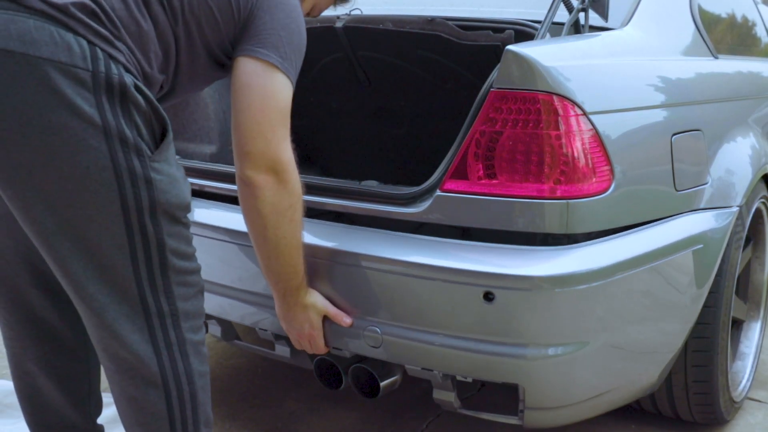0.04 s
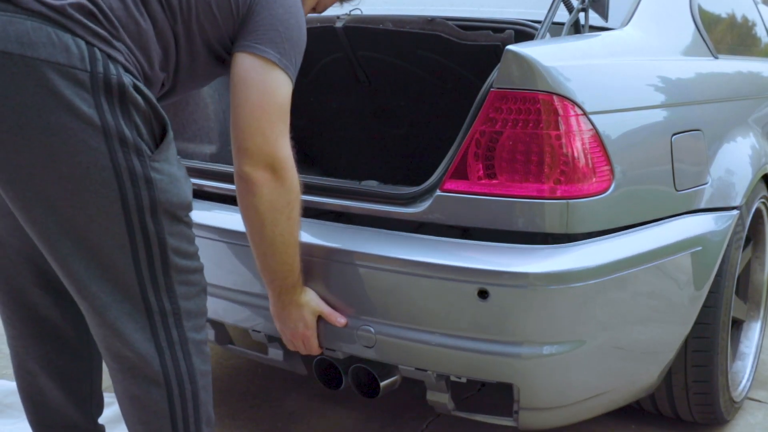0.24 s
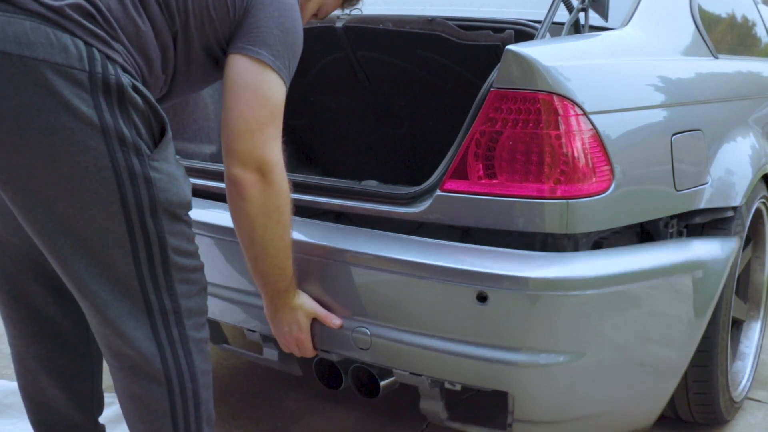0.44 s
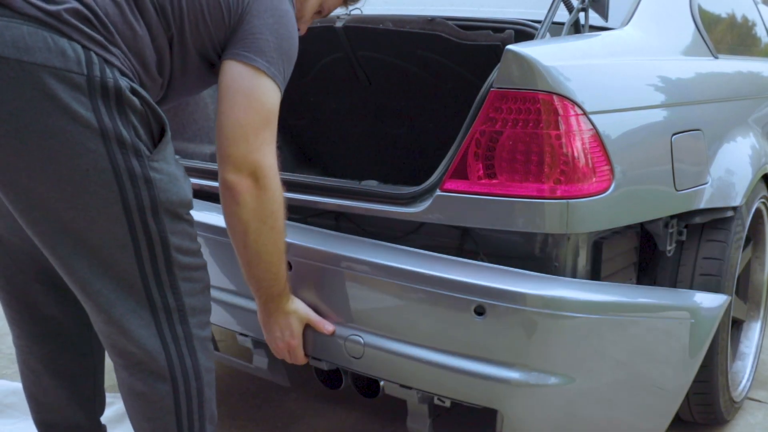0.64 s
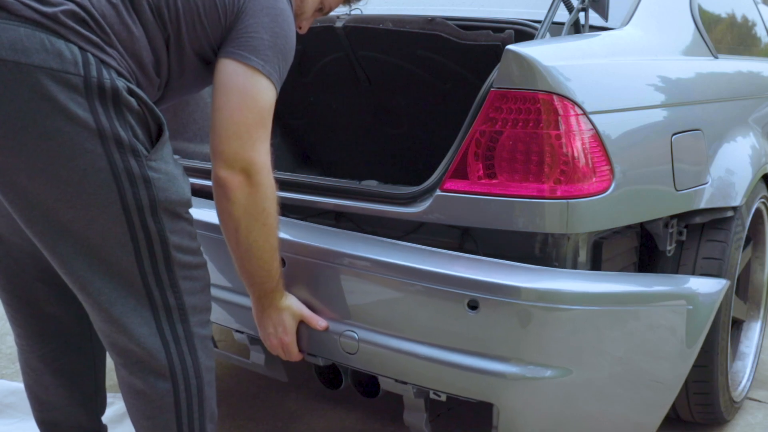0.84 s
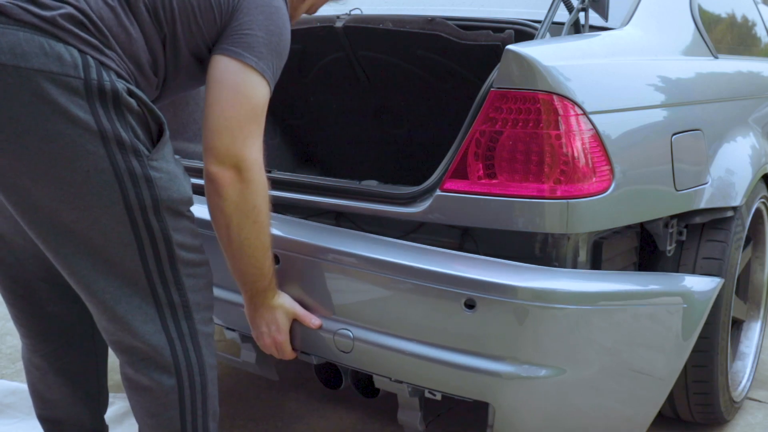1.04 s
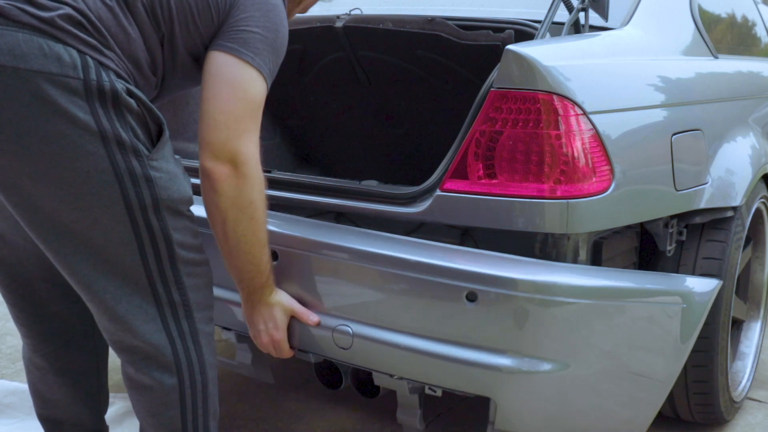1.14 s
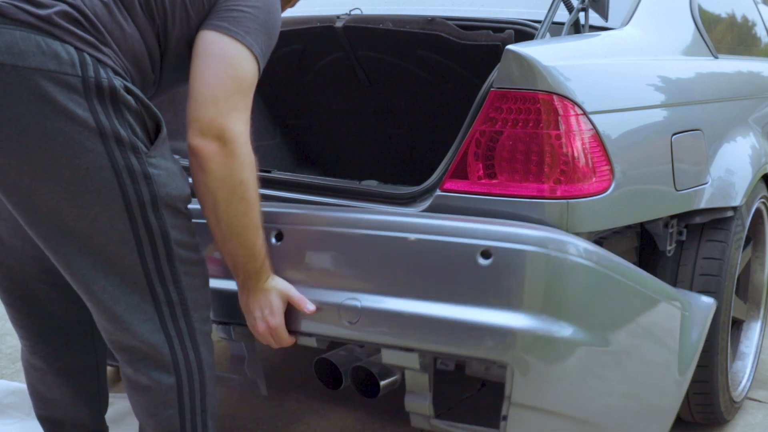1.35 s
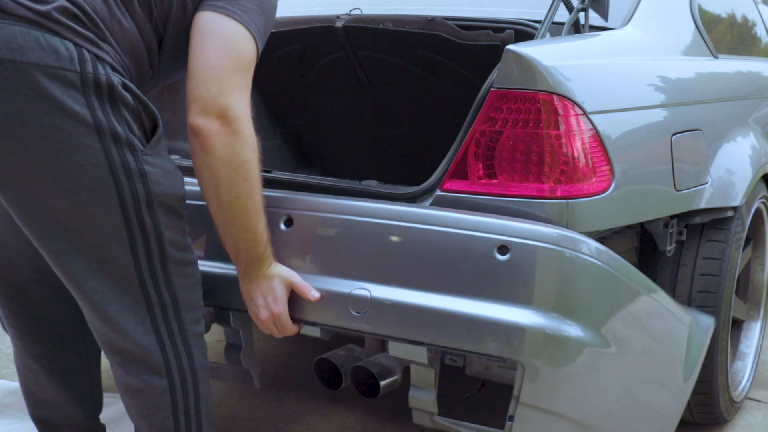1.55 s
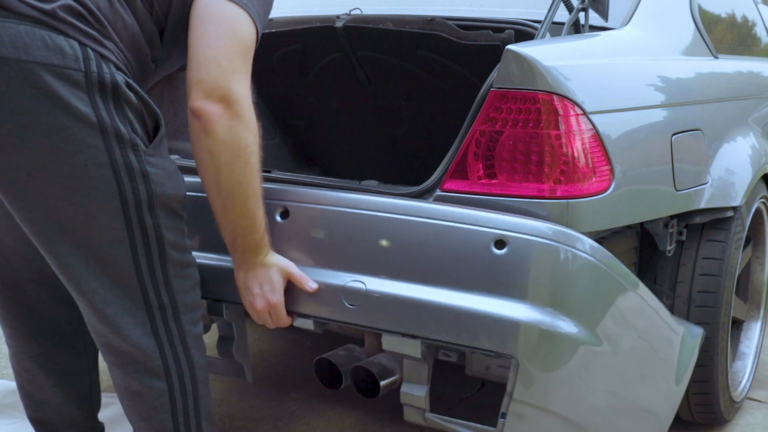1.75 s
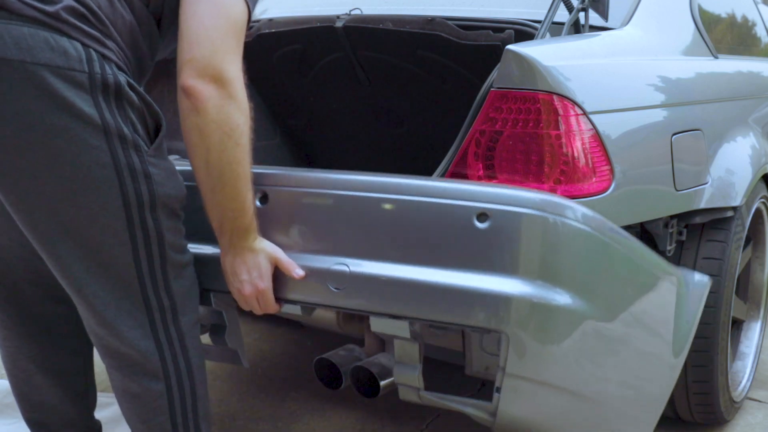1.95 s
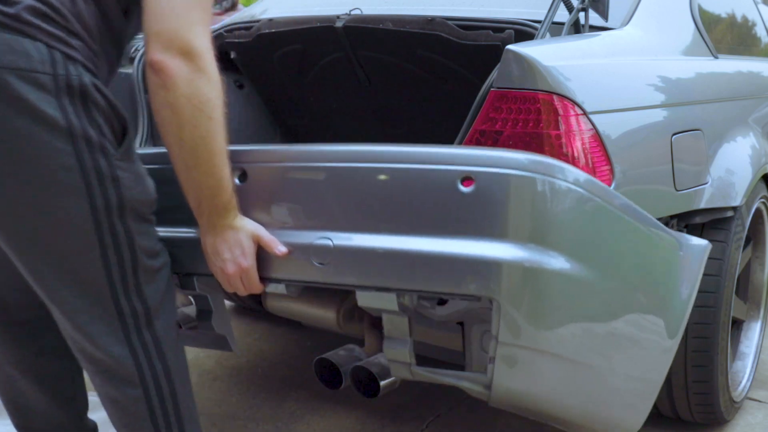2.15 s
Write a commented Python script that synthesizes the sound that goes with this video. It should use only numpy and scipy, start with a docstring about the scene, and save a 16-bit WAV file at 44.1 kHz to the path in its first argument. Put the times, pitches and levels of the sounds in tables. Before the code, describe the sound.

A car's plastic bumper is pulled loose, cracking and clattering, then knocking with a dull boom

```python
"""A plastic bumper cover is pulled off a car in a garage, over a low room rumble and hiss.
First it jumps off its mounts: clusters of knocks ring the modes of each part, and clips snap as noise cracks.
Between the knocks, stick-slip pulses drag it over the brackets, and gliding chirps squeak on the paint.
Past one second the freed shell booms softly, a low tone with narrow noise, among more knocks.
The last scrapes, a squeak and a snap end the removal."""
import sys
import numpy as np
from scipy import signal
from scipy.fft import rfft, irfft
from scipy.io import wavfile
from scipy.ndimage import uniform_filter1d, minimum_filter1d, map_coordinates

SR = 44100
rng = np.random.default_rng(int(sys.argv[2]) if len(sys.argv) > 2 else 0)


def to_wav(s):
    """Save 16-bit WAV."""
    ch = np.atleast_2d(s).T  # columns
    pcm = np.round(np.clip(ch, -1, 1) * 32767)  # PCM
    wavfile.write(sys.argv[1], SR, pcm.astype(np.int16))


N = 97020

# Frequencies at which each knock's level is given: hz
KNOCK_BAND_HZ = (230, 500, 1000, 2300, 6000, 13000)
# Blows: start_s, part, rise_s, then one level_db per KNOCK_BAND_HZ
KNOCK_EVENTS = [ (0.182, "edge", 0.012, -25, -34.5, -23, -41, -37, -93),
                (0.2264, "corner", 0.0022, -5.5, -7.5, -17.5, -18, -27, -47),
                (0.2472, "corner", 0.0043, -16, -11, -16.5, -19.5, -24, -41),
                (0.2556, "corner", 0.002, -13.5, -20, -24, -14.5, -25, -46),
                (.280, "corner", 0.0016, -35, -20, -19.5, -19, -31.5, -46),
                (0.2898, "corner", 0.0015, -16, -51, -48, -40, -55, -60),
                (.436, "edge", 0.0015, -52, -46, -31, -35, -48, -69),
                (0.4632, "bracket", 0.0015, -35, -41, -36, -46, -60, -66),
                (.503, "bracket", 0.0031, -62, -21, -29, -33.5, -41, -64),
                (0.5338, "bracket", 0.0013, -18, -13.5, -9.5, -17.5, -26, -59),
                (.5415, "bracket", 0.00061, -42, -11.5, -7, -14.5, -27, -66),
                (.564, "bracket", 0.0017, -13.5, -39, -33, -42, -64, -74),
                (.595, "edge", 0.0049, -18, -47, -20, -23.5, -31, -55),
                (0.6033, "edge", 0.00042, -65, -10.5, -11.5, -17.5, -29, -53),
                (0.627, "edge", 0.0011, -24, -29, -31, -34, -46, -47),
                (0.6804, "edge", .001, -56, -54, -78, -25.5, -40, -64),
                (0.6892, "edge", 0.0018, -57, -31, -43.5, -44, -52, -61),
                (.847, "shell", 0.0024, -27.5, -35, -34, -41.5, -80, -89),
                (0.872, "shell", 0.0027, -38, -101, -65, -54, -72, -74),
                (0.932, "shell", 0.0029, -31.5, -68, -70, -76, -76, -83),
                (1.092, "edge", 0.0012, -25.5, -35.5, -37.5, -46, -51, -59),
                (1.124, "edge", 0.0016, -40, -31, -35, -51, -58, -57),
                (1.13, "skirt", 0.003, -25.5, -38, -38, -45, -56, -66),
                (1.1436, "skirt", 0.002, -20, -22.5, -24, -44, -47, -64),
                (1.155, "skirt", 0.0015, -31, -37, -40, -50, -56, -68),
                (1.199, "skirt", 0.0014, -34, -42, -44, -39.5, -38.5, -45),
                (1.308, "edge", 0.0027, -31, -29, -33, -24.5, -43.5, -42),
                (1.338, "edge", 0.0036, -35, -53, -32, -39, -49, -49),
                (1.421, "rail", 0.0014, -12.5, -14.5, -28.5, -14.5, -33, -32),
                (1.430, "rail", 0.0022, -29, -22, -17.5, -18.5, -34, -37),
                (1.443, "rail", .002, -18.5, -15, -35, -20.5, -40.5, -34.5),
                (1.470, "rail", 0.00098, -25, -27.5, -35.5, -45, -49, -64),
                (1.587, "edge", 0.002, -48, -38, -44, -40, -73, -68),
                (1.679, "edge", 0.0021, -64, -65, -40.5, -34.5, -61, -75),
                (1.706, "edge", 0.0011, -65, -45, -49, -41, -48, -73),
                (1.832, "rail", 0.0025, -30.5, -35.5, -34, -35.5, -54, -77),
                (1.849, "edge", 0.0015, -36, -49, -48, -47, -49, -82)]
# Ringing modes by struck part: mode_hz, relative_level_db, t60_s
PART_MODES = { "corner": [(170.9, -12.5, 0.18), (201, -12, 0.12), (287.5, -10.5, 0.24), (350.1, -15, 0.27),
              (464.3, -9.5, 0.21), (499, -2.5, 0.12), (766, -16, 0.16), (843, -14.5, 0.12),
              (944, -23, 0.25), (1143, -12, 0.11), (1326, -22, 0.11), (1592, -15, 0.078), (1706, -15, 0.1),
              (3250, -13, 0.061)], "bracket": [(275, -3, 0.11), (297.3, 0.5, 0.14), (461, -11, 0.12),
              (556.5, 3.5, 0.068), (660, -18, 0.15), (871, -5, 0.056), (1036, -18.5, 0.14),
              (1078, -13, 0.066), (1396, -17, 0.18), (1597, -2, 0.027), (1900, -39, 0.088),
              (2050, -16, 0.061), (2426, -11, 0.036), (2800, -7, 0.027)], "edge": [(400, -4.5, 0.11),
              (608, -3, 0.067), (760, -3.5, 0.077), (820, -3.5, 0.083), (1052, -4.5, 0.051),
              (1139, -8, 0.082), (1384, -12, 0.055), (1860, -11.5, 0.05), (2250, -23.5, 0.11)],
              "shell": [(127.6, 7.5, 0.047), (203.4, -0.5, 0.081), (271, -6.5, 0.18), (401, -9, 0.15),
              (454, -17, 0.12), (508, -1, 0.14)], "skirt": [(277.4, -1.5, 0.12), (400.6, 2.5, 0.085),
              (520, -5.5, 0.095), (662, -16, 0.11)], "rail": [(180.3, -9, 0.15), (263.6, -11, 0.11),
              (472, -5, 0.083), (525, -6.5, 0.092), (865, -7.5, 0.089), (1095, -3, 0.071),
              (1370, -1.5, 0.046), (1746, -13, 0.086)]}
# Dense, damped vibration of the plastic: point_hz, relative_level_db, t60_s
CLATTER_CURVE = [(198, -7, 0.26), (530, -3, 0.095), (1120, -2, 0.091), (2430, -9, 0.07),
                 (4600, -12.5, 0.12), (8150, -2.5, 0.08), (10500, -10.5, 0.11), (15000, -7.5, 0.082)]
# Clatter by struck part, softer parts less: relative_level_db
CLATTER_BY_PART_DB = {"corner": -1.5, "bracket": -3.5, "edge": -4, "shell": -2, "skirt": -7, "rail": -3.5}
# Retaining clips: start_s, level_db, centre_hz, width_hz, t60_s
SNAP_EVENTS = [(0.2269, -32.5, 8050, 3970, 0.035), (.257, -35.5, 8000, 5000, 0.049),
               (.2615, -28, 3830, 1200, 0.035), (.534, -22.5, 2300, 1290, 0.034),
               (0.5427, -35, 6940, 3870, 0.039), (.6045, -40.5, 6860, 6000, 0.036),
               (.6795, -57, 12000, 9000, 0.025), (0.6905, -50, 11500, 12000, 0.014),
               (.809, -53, 9150, 12000, 0.034), (0.829, -50, 8100, 8000, 0.05),
               (1.4213, -34.5, 9800, 7040, 0.02), (1.831, -38, 1730, 696, 0.059),
               (2.048, -51.5, 6500, 2500, 0.046)]
# Drags: start_s, swell_s, fade_s, level_db, centre_hz, width_hz, treble_edge_hz,
# slips_per_s, ring_hz, ring_relative_db
SCRAPE_EVENTS = [ (.325, .055, 0.022, -51, 4140, 9000, 8740, 680, 8000, -9),
                 (0.417, 0.015, 0.053, -37, 1000, 1160, 2550, 320, 554, 1.5),
                 (0.446, 0.017, 0.01, -38.5, 700, 1170, 2130, 160, 570, 4.5),
                 (0.429, 0.034, 0.013, -66, 7900, 6000, 11000, 430, 8100, 9),
                 (0.419, 0.027, 0.12, -37.5, 236, 149, 500, 390, 204, -2.5),
                 (0.691, 0.01, 0.05, -47, 600, 700, 1500, 330, 500, 1),
                 (.745, 0.018, 0.059, -54.5, 1500, 2000, 2950, 690, 1485, 2),
                 (.803, 0.0077, 0.034, -48.5, 3000, 6000, 12000, 2700, 1920, 4),
                 (0.822, 0.0078, 0.031, -45.5, 2020, 3000, 5960, 1400, 1470, 4.5),
                 (1.03, 0.018, 0.19, -45.5, 535, 720, 1560, 200, 645, -6),
                 (1.079, 0.038, 0.093, -42.5, 810, 890, 2160, 270, 1120, -14),
                 (1.114, 0.022, 0.069, -30.5, 446, 300, 895, 310, 279, -5.5),
                 (1.11, 0.028, 0.035, -49.5, 1380, 1300, 3200, 330, 1136, 6),
                 (1.267, 0.051, 0.088, -45.5, 1050, 1500, 3360, 360, 1000, -6),
                 (1.515, 0.016, 0.09, -54.5, 900, 1300, 2400, 220, 860, -5),
                 (1.92, 0.055, 0.18, -46, 1060, 644, 2230, 810, 1146, -8),
                 (1.96, 0.089, 0.2, -53.5, 1800, 900, 2500, 440, 2230, -13)]
# Plastic on paint: start_s, length_s, start_hz, end_hz, level_db, octave_relative_db, rasp_relative_db
SQUEAK_EVENTS = [(0.679, 0.0049, 7860, 7500, -47, -14, -8), (0.688, 0.01, 7540, 8940, -44, -14, -13),
                 (0.7213, 0.0052, 9900, 7750, -48, -10, -4), (0.758, 0.016, 8300, 6900, -49.5, -12, -8),
                 (.795, 0.0074, 14600, 13000, -62, -40, -6), (0.798, 0.0092, 9400, 8700, -46.5, -20, -12),
                 (1.113, 0.02, 3100, 3020, -47.5, -22, -10), (1.951, 0.02, 3800, 3600, -54, -24, -18)]
# Boom of the freed shell: time_s, level_db
BOOM_LEVELS = [(1.135, -43), (1.16, -33), (1.20, -34.5), (1.25, -40), (1.33, -40.5), (1.40, -47.5),
               (1.552, -52)]
# Room spectrum: point_hz, relative_density_db
ROOM_SPECTRUM = [(20, -31), (30, -8), (48, -5), (80, -1), (125, 2), (180, 0), (300, -6.5), (500, -9),
                 (900, -13), (1400, -19.5), (2400, -27), (5000, -31.5), (9000, -32.5), (15500, -37.5)]
# Room level over time: time_s, level_db
ROOM_LEVELS = [(0, -42), (.15, -46), (.5, -43.5), (1.0, -46), (1.5, -44), (2.2, -45)]

RING_DB = 1.5
BENDING_LAG_S = 0.001926  # bending waves of 500 Hz arrive this late, higher ones sooner
CLATTER_HOLD_S, CLATTER_LOW_HZ = 0.00083, 222
TAIL_DB, TAIL_T60_S = -22, 0.48
PANEL_LOW_HZ = 89  # the thin shell radiates little below this
SLIP_SPREAD_DB, RUB_NOISE_RMS = 2.5, 0.74
SCRAPE_RING_Q = 20
RING_DRIFT_SHARE, RING_DRIFT_S = 0.0355, 0.0192  # rms share of pitch; smoothing time
SCRAPE_ROOM_DB, SQUEAK_ROOM_DB, ROOM_T60_S = -4.0, -1, 0.063
SQUEAK_JITTER_SHARE, SQUEAK_RASP_WIDTH_HZ = 0.03, 4600
BOOM_HZ, BOOM_WIDTH_HZ, BOOM_SHUDDER_DB = 145, 93, -3
CEILING, LIMITER_S, TOP_HZ = 0.92, 0.004, 15800


def undb(db):
    """Decibels to gain."""
    return 10 ** (np.asarray(db) / 20)


def unit(x):
    """Scale to rms 1."""
    return x / np.sqrt(np.mean(x ** 2) + 1e-20)


def fade(t, t60_s):
    """Exponential decay that starts at t = 0."""
    return np.exp(-np.log(1000) * np.maximum(t, 0) / t60_s)


def over_hz(hz, points_hz, values):
    """Read a curve on a log-frequency axis."""
    return np.interp(np.log(hz), np.log(points_hz), values)


def add(out, start_s, x):
    """Mix x into out from a start time on."""
    i = max(int(start_s * SR), 0)
    out[i:i + len(x)] += x[:len(out) - i]


def butter(x, order, hz, kind):
    """Butterworth filter."""
    return signal.sosfilt(signal.butter(order, hz, kind, fs=SR, output="sos"), x)


def resonate(x, hz, width_hz):
    """Two-pole band-pass."""
    damping = width_hz / hz
    warped_rate = .5 / np.tan(np.pi * min(hz, SR / 3) / SR)
    b, a = signal.bilinear([damping, 0], [1, damping, 1], warped_rate)
    return signal.lfilter(b, a, x)


def garage(x, db):
    """Diffuse reflections from walls and car body, as decaying noise."""
    t = np.arange(SR // 3) / SR
    ir = rng.standard_normal(len(t)) * fade(t, ROOM_T60_S)
    reflections = signal.fftconvolve(x, ir / np.linalg.norm(ir))[:N]
    return x + undb(db) * reflections


def knock_ring(t, since_first_s, part, rise_s, dbs):
    """One blow rings a part's modes, in step with its first blow; higher modes arrive sooner."""
    ring = np.zeros(len(t))
    for hz, db, t60_s in PART_MODES[part]:
        envelope = np.minimum(t / (rise_s + .5 / hz), 1) * fade(t, t60_s)
        lag_s = BENDING_LAG_S * np.sqrt(500 / hz)
        swing = np.sin(2 * np.pi * hz * (t + since_first_s - lag_s))
        ring += undb(db + over_hz(hz, KNOCK_BAND_HZ, dbs)) * envelope * swing
    return ring


def knocks():
    """Blows ring each part's modes and add a clatter of dense modes, as band noise with a faint tail."""
    rings, clatters = np.zeros(N), np.zeros(N)
    t = np.arange(SR // 2) / SR
    centres_hz = 220 * 2 ** (np.arange(13) / 2)  # half-octave steps
    edge = 2 ** (1 / 4)
    bands = [butter(rng.standard_normal(N + SR), 3, [hz / edge, hz * edge], "band") for hz in centres_hz]
    points_hz, colour_db, t60s_s = np.array(CLATTER_CURVE).T
    tail = undb(TAIL_DB) * fade(t, TAIL_T60_S)
    shapes = [np.hypot(fade(t - CLATTER_HOLD_S, over_hz(hz, points_hz, t60s_s)), tail)
              for hz in centres_hz]
    first_blow_s = {}
    for start_s, part, rise_s, *dbs in KNOCK_EVENTS:
        since_first_s = start_s - first_blow_s.setdefault(part, start_s)
        add(rings, start_s, knock_ring(t, since_first_s, part, rise_s, dbs))
        cuts = rng.integers(SR // 10, N, len(centres_hz))  # a fresh piece of noise per band
        for hz, band, shape, i in zip(centres_hz, bands, shapes, cuts):
            burst = band[i:i + len(t)] * shape
            burst *= np.linalg.norm(shape) / np.linalg.norm(burst)
            burst *= np.minimum(t / rise_s, 1)
            blow_db = over_hz(hz, KNOCK_BAND_HZ, dbs)
            level_db = CLATTER_BY_PART_DB[part] + blow_db + over_hz(hz, points_hz, colour_db)
            add(clatters, start_s, burst * undb(level_db))
    clatters = butter(clatters, 2, CLATTER_LOW_HZ, "high")
    return butter(undb(RING_DB) * rings + clatters, 2, PANEL_LOW_HZ, "high")


def snaps():
    """Small clips let go: brief, decaying cracks of band noise."""
    out, t = np.zeros(N), np.arange(SR // 10) / SR
    for start_s, db, hz, width_hz, t60_s in SNAP_EVENTS:
        noise = rng.standard_normal(len(t))
        crack = unit(resonate(resonate(noise, hz, width_hz), hz, 2 * width_hz))
        add(out, start_s, undb(db) * crack * fade(t, t60_s))
    return out


def scrapes():
    """Uneven stick-slip pulses and rubbing noise ring the cover; the ring wavers as the contact moves."""
    out, t = np.zeros(N), np.arange(N) / SR
    for start_s, swell_s, fade_s, db, hz, width_hz, top_hz, rate_per_s, ring_hz, ring_db in SCRAPE_EVENTS:
        slips = (rng.random(N) < rate_per_s / SR) * undb(SLIP_SPREAD_DB * rng.standard_normal(N))
        force = unit(slips) + RUB_NOISE_RMS * rng.standard_normal(N)
        drag = butter(resonate(force, hz, width_hz), 2, min(top_hz, SR / 3), "low")
        ring = resonate(force, ring_hz, ring_hz / SCRAPE_RING_Q)
        ring = resonate(ring, ring_hz, ring_hz / 2)
        wander = unit(uniform_filter1d(rng.standard_normal(N), int(RING_DRIFT_S * SR)))
        read_at = np.cumsum(1 + RING_DRIFT_SHARE * wander)  # uneven reading speed bends the pitch
        ring = map_coordinates(ring, [read_at], order=1, mode="mirror")
        envelope = np.interp(t - start_s, [0, swell_s, swell_s + fade_s], [0, 1, 0])
        out += undb(db) * (unit(drag) + undb(ring_db) * unit(ring)) * envelope
    return garage(out, SCRAPE_ROOM_DB)


def squeaks():
    """Plastic slips on paint: short gliding tones with an octave, pitch jitter and raspy noise."""
    out = np.zeros(N)
    for start_s, length_s, from_hz, to_hz, db, octave_db, rasp_db in SQUEAK_EVENTS:
        u = np.linspace(0, 1, int(length_s * SR))
        waver = unit(uniform_filter1d(rng.standard_normal(SR // 10), size=24))[:len(u)]
        rasp = unit(resonate(rng.standard_normal(SR // 10), from_hz, SQUEAK_RASP_WIDTH_HZ))[:len(u)]
        glide_hz = from_hz + (to_hz - from_hz) * u
        phase = 2 * np.pi * np.cumsum(glide_hz * (1 + SQUEAK_JITTER_SHARE * waver)) / SR
        tone = np.sqrt(2) * (np.sin(phase) + undb(octave_db) * np.sin(2 * phase))
        add(out, start_s, undb(db) * np.sin(np.pi * u) * (tone + undb(rasp_db) * rasp))
    return garage(out, SQUEAK_ROOM_DB)


def boom():
    """A low mode of the loose shell, kept ringing unevenly while it slides: a tone plus narrow noise."""
    t = np.arange(N) / SR
    times_s, dbs = np.array(BOOM_LEVELS).T
    shudder = resonate(rng.standard_normal(N), BOOM_HZ, BOOM_WIDTH_HZ)
    shudder = unit(resonate(shudder, BOOM_HZ, BOOM_WIDTH_HZ))
    tone = np.sqrt(2) * np.sin(2 * np.pi * BOOM_HZ * t)
    sounding = (t > times_s[0]) & (t < times_s[-1])
    return (tone + undb(BOOM_SHUDDER_DB) * shudder) * undb(np.interp(t, times_s, dbs)) * sounding


def room_tone():
    """Low rumble and faint hiss: noise shaped in the spectrum, its level drifting."""
    hz = np.maximum(np.arange(N // 2 + 1) * SR / N, 1)
    density = undb(over_hz(hz, *np.array(ROOM_SPECTRUM).T))
    noise = irfft(rfft(rng.standard_normal(N)) * density, N)
    level_db = np.interp(np.arange(N) / SR, *np.array(ROOM_LEVELS).T)
    return unit(noise) * undb(level_db)


def scene():
    """All sources summed to one channel."""
    return (knocks() + snaps() + scrapes() + squeaks() + boom() + room_tone())[None]


def record(dry):
    """A fast limiter turns down peaks above the ceiling, then a steep low-pass cuts the top."""
    size = int(LIMITER_S * SR)
    needed_gain = CEILING / np.maximum(np.abs(dry), CEILING)
    gain = uniform_filter1d(minimum_filter1d(needed_gain, size), size)
    low_pass = signal.ellip(10, .2, 80, TOP_HZ, fs=SR, output="sos")
    return signal.sosfilt(low_pass, gain * dry)


dry = scene()
out = record(dry)
to_wav(out)
```